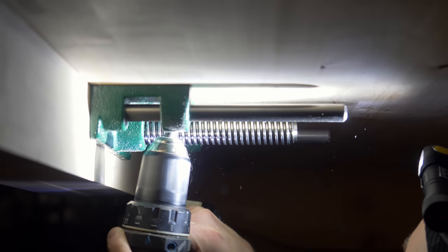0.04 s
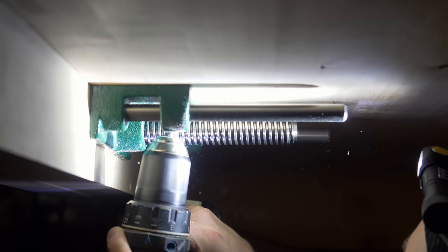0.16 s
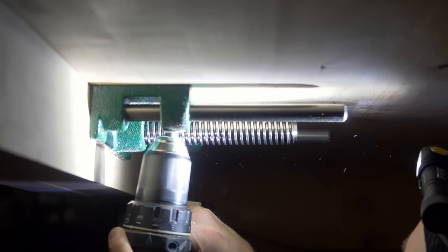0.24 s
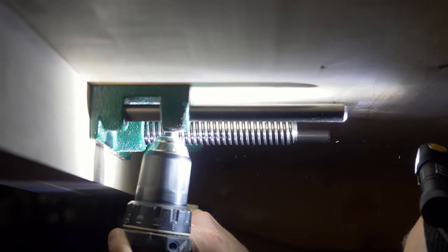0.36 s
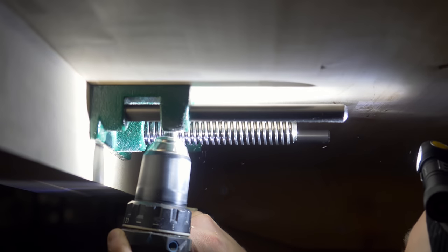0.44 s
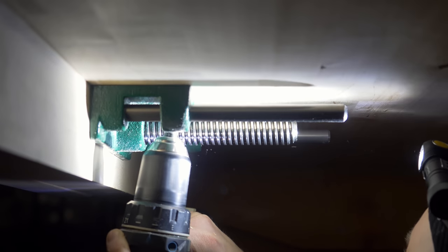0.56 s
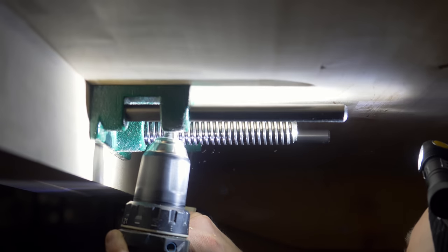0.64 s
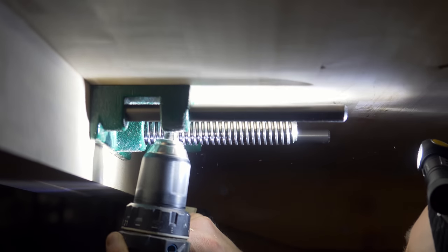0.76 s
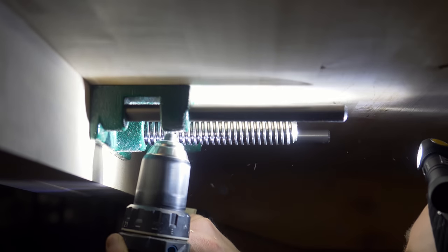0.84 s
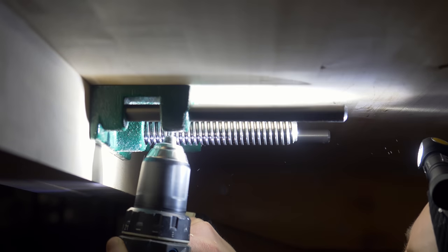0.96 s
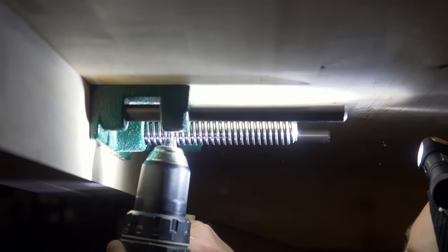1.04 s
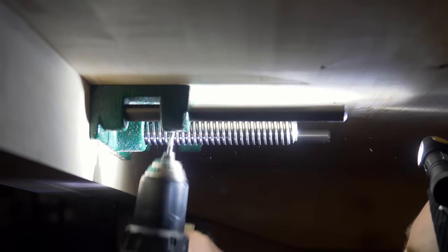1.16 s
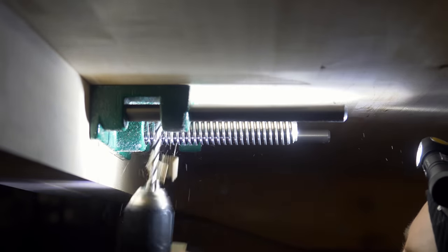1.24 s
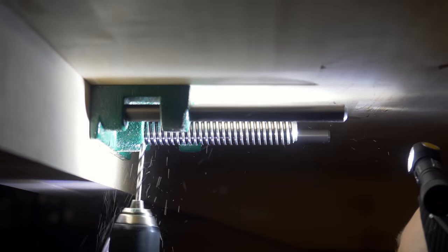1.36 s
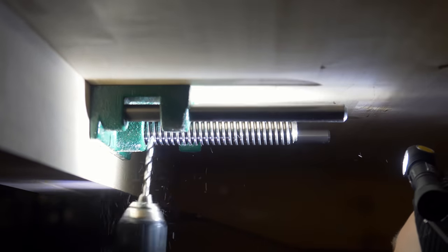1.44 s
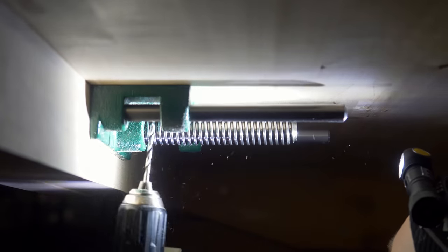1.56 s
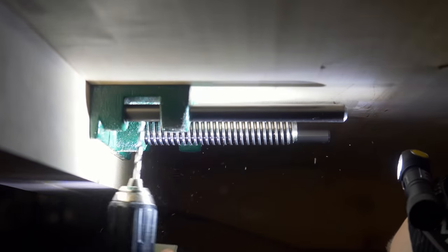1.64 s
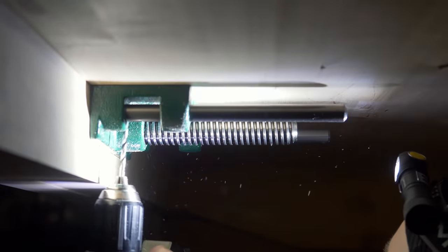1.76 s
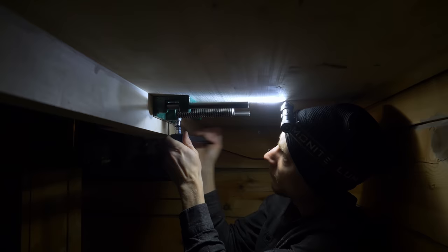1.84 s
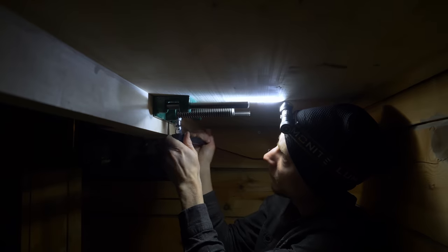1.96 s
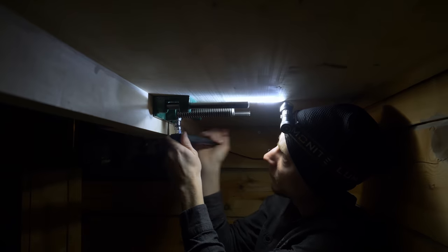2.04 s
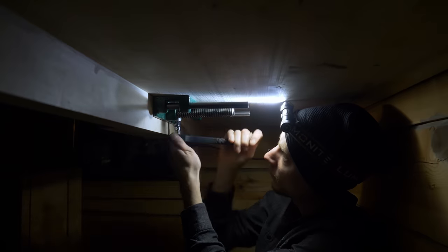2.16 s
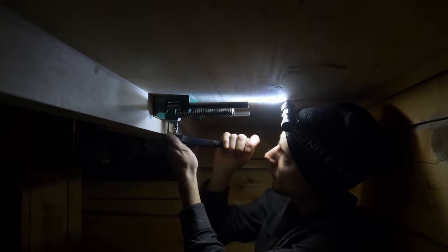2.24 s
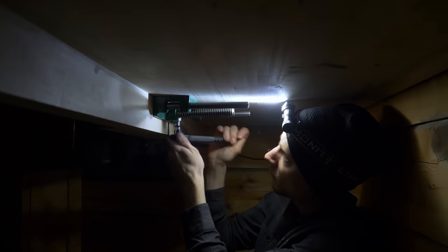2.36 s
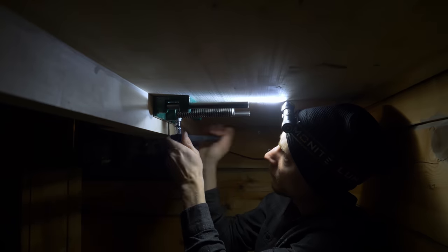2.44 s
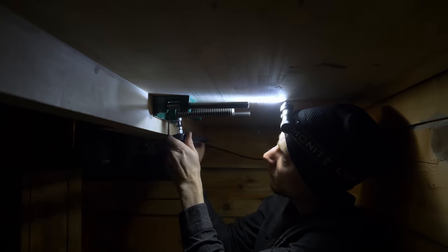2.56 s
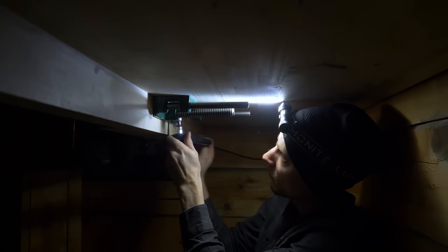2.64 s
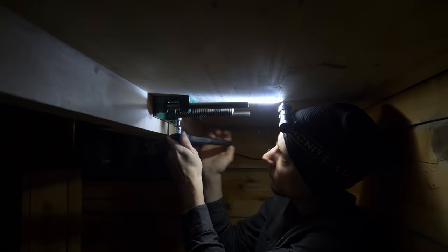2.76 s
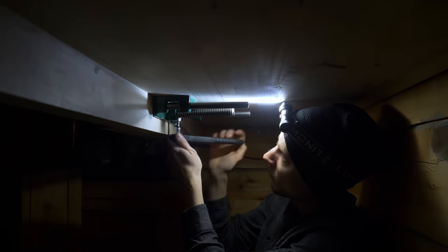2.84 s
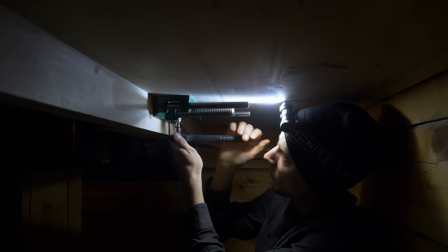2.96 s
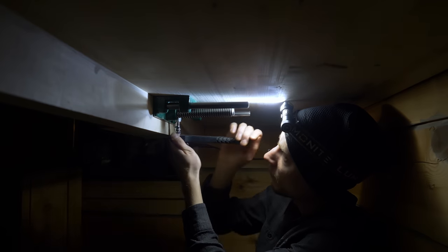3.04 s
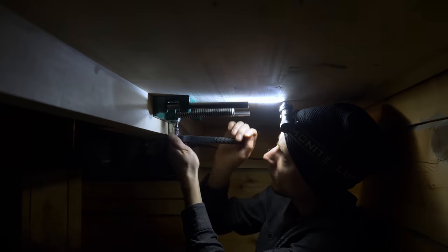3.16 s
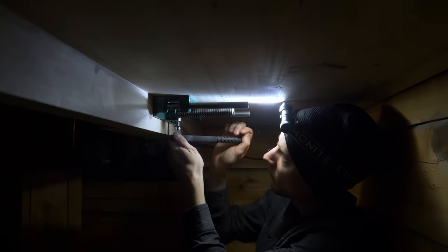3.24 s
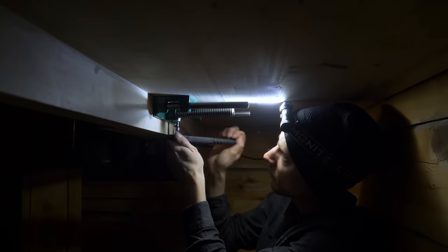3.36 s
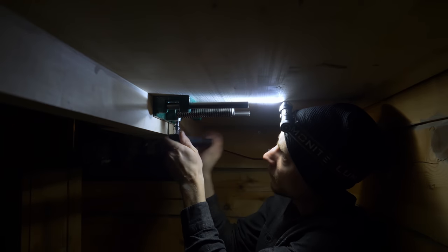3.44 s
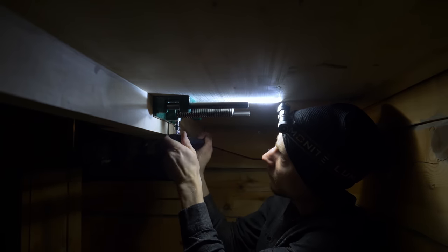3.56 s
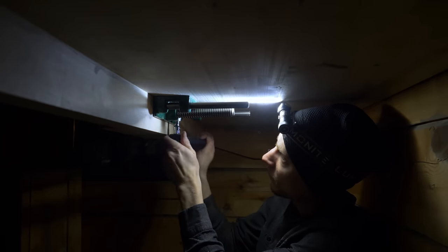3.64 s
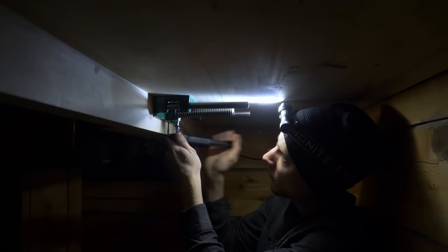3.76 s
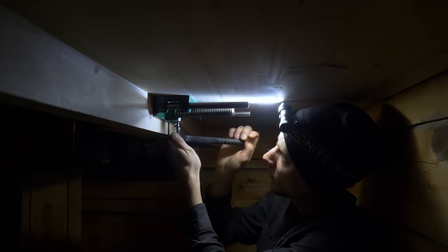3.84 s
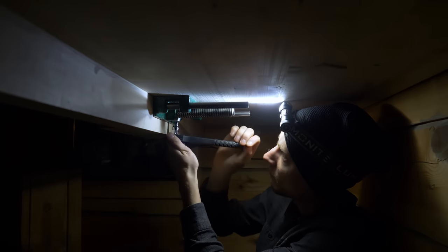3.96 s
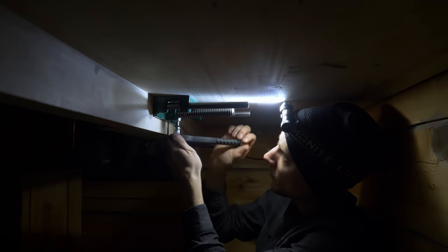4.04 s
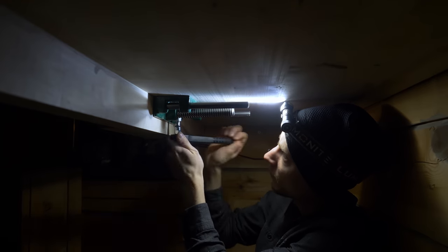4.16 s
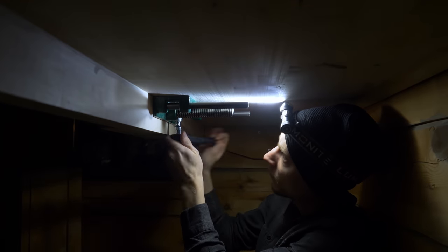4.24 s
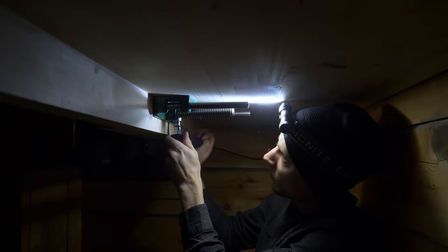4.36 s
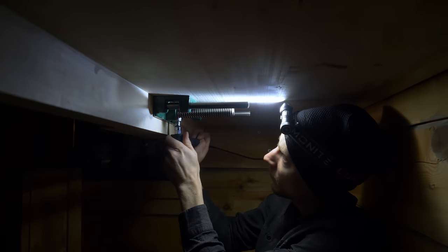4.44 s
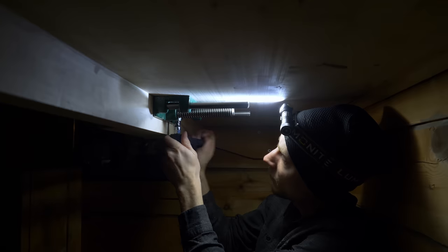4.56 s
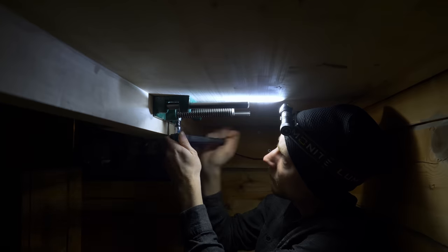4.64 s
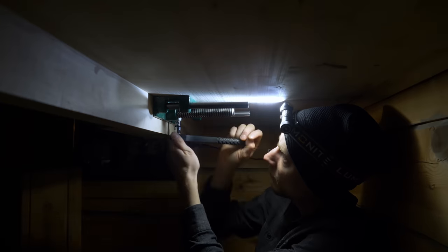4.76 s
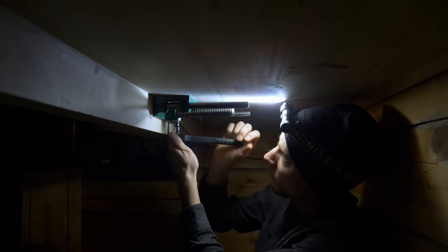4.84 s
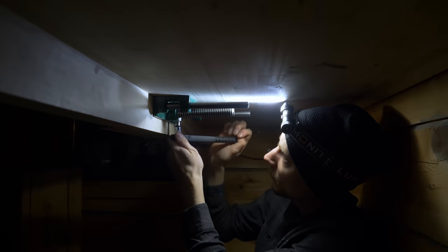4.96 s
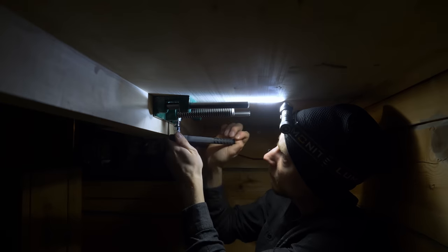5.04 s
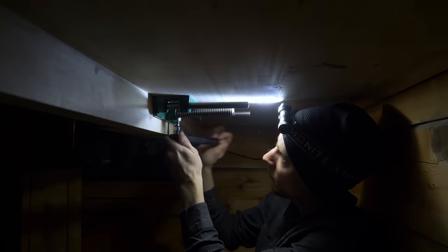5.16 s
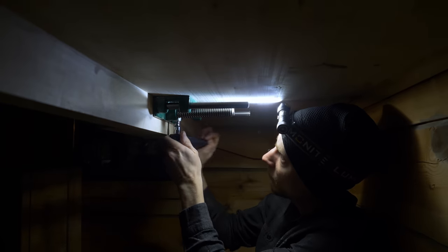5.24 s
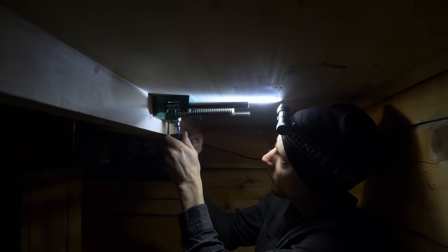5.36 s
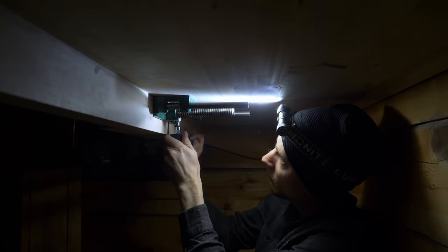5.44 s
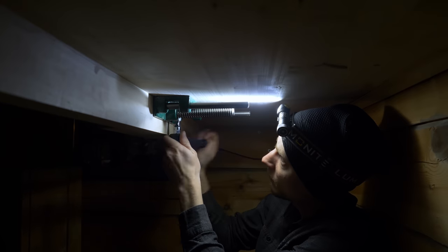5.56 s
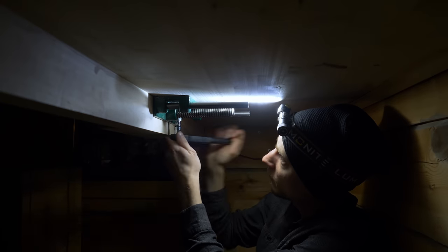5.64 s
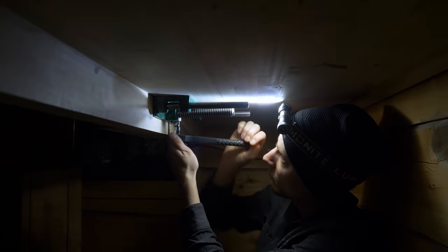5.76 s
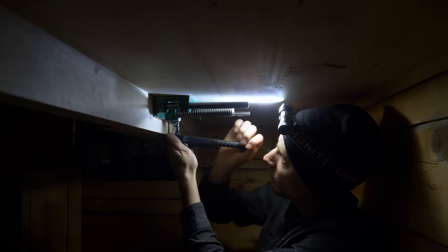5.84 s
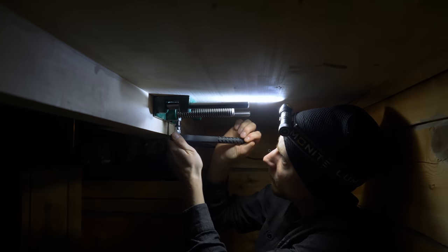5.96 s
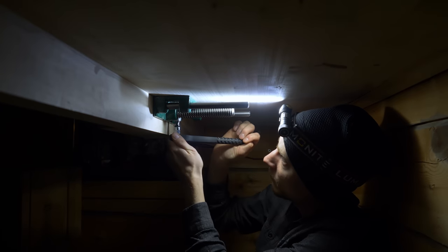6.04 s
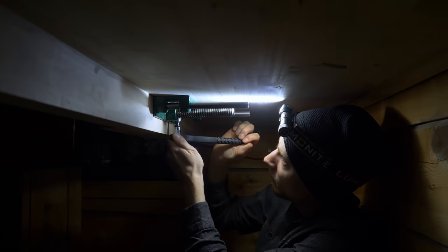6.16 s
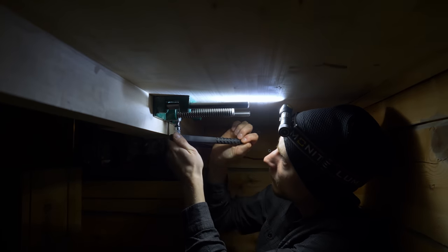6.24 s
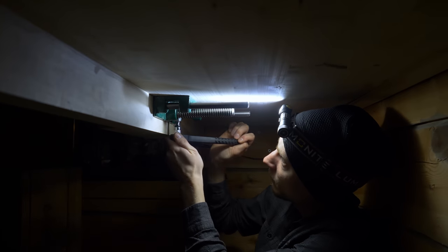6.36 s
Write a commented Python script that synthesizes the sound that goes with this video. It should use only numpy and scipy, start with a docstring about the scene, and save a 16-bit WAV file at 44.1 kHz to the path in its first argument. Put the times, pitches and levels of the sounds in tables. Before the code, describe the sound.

From the start a cordless drill bores into metal, close and loud: motor hum, gear whine and a gritty, bright rattle at a steady pitch. From about 0.75 s the pitch climbs, jumping around 1.05 s as the bit breaks through and runs free, with a clearer whine. It eases and stops abruptly at 1.5 s with a hard chuck clack and a short room tail. Near-silence follows, with faint hiss and rumble. From 1.9 s a wrench socket knocks lightly on steel and wood. Crisp ratchet runs of about five to seven clicks come near 2.15, 2.8-3.1 (broken in two), 3.85, 4.7 and 5.7 s, with small scrapes. Between them are uneven clacks, woody knocks and low bench thumps, strongest at 3.76 and 5.66 s. A last knock at 5.97 s and a soft thump fade into quiet air. Two close microphones, small workshop.

```python
"""A drill's whine and rattle come first, rising as the bit breaks through, then stopping short.
A cordless drill bores up through the holes of a metal vise under a wooden bench top; a ratchet wrench
then tightens a bolt in five strokes, clicking on each back swing and knocking the vise and boards.
Drill tones follow the shaft speed; blows are short noise bursts and dying modes of steel and wood.
Two close microphones face the work straight on, in a small workshop with faint hiss and rumble."""
import sys
import numpy as np
from scipy import signal
from scipy.fft import rfft, irfft
from scipy.io import wavfile
from scipy.ndimage import uniform_filter1d

SR = 44100
rng = np.random.default_rng(int(sys.argv[2]) if len(sys.argv) > 2 else 0)


def log_audio(samples):
    """Write samples as a 16-bit WAV file to the path given in sys.argv[1]."""
    # one column per channel
    frames = np.atleast_2d(samples).T
    # limit to full scale, then quantise
    limited = np.clip(frames, -1, 1)
    pcm = np.round(limited * 32767).astype(np.int16)
    wavfile.write(sys.argv[1], SR, pcm)


N = 282240
TIME = np.arange(N) / SR


def amp(db):
    """Decibels to gain."""
    return 10 ** (np.asarray(db) / 20)


def unit(x):
    """Scales to rms 1."""
    return x / np.sqrt(np.mean(x ** 2) + 1e-20)


def unit_blow(x, count):
    """Scales a blow to rms 1 over its first samples."""
    return x / np.sqrt(np.mean(x[:count] ** 2) + 1e-20)


def read(points, hz):
    """Reads a table of (Hz, value) on a log-frequency axis."""
    f, value = np.transpose(points)
    return np.interp(np.log(hz + 1), np.log(f + 1), value)


def colour(x, points, tilt_db=0):
    """Causal minimum-phase filter with the given spectrum, tilted in dB an octave above 1500 Hz."""
    hz = abs(np.fft.fftfreq(4096, 1 / SR))
    octaves = np.log2(np.maximum(hz / 1500, 1))
    log_gain = np.log(amp(read(points, hz) + tilt_db * octaves))
    # the Hilbert transform of the log gain gives the phase that puts the energy earliest
    taps = np.fft.ifft(np.exp(np.conj(signal.hilbert(log_gain)))).real
    return signal.fftconvolve(x, taps[:len(taps) // 2])[:len(x)]


def wander(rate_hz):
    """Slow random drift of rms 1, weakening above the given rate."""
    hz = np.fft.rfftfreq(N, 1 / SR)
    spectrum = rfft(rng.standard_normal(N))
    return unit(irfft(spectrum / (1 + (hz / rate_hz) ** 2), N))


def add(mix, s, sound):
    """Lays a sound into the mix at time s."""
    part = mix[round(s * SR):][:len(sound)]
    part += sound[:len(part)]


def ring(modes, t, spread_db, detune):
    """Dying modes of a struck body; each blow shifts them a little and shares its force out anew."""
    hz, t60, db = np.transpose(modes)[:, :, None]
    size, shift, sign = rng.standard_normal((3, len(modes), 1))
    decay = np.sign(sign) * amp(db + spread_db * size - 60 * t / t60)
    tones = np.sin(2 * np.pi * hz * (1 + detune * shift) * t)
    return (decay * tones).sum(0)


def chatter(t, rise, fall, grain=0.42):
    """A burst of tiny contacts, uneven in force, that swells and dies (rise and fall in s)."""
    noise, force = rng.standard_normal((2, len(t)))
    uneven = np.exp(grain * np.tanh(unit(uniform_filter1d(force, size=50))))
    swell = 1 - np.exp(-(t / rise) ** 2)
    return noise * uneven * swell * np.exp(-t / fall)


# the motor shaft speeds up as the bit breaks through: time_s, speed (turns a second)
SHAFT_SPEED = [(0, 256.3), (.3, 256.6), (.52, 259.6), (.72, 260.7), (.8, 269.4), (1.0, 276.7), (1.06, 305),
               (1.22, 318), (1.41, 318.8), (1.53, 293)]
# shaft speed with the bit biting, easing and running free (turns a second)
BITING_HZ, EASING_HZ, FREE_HZ = 256.6, 261, 319
# one level until the trigger is let go; load rises steeply as the speed sags
DRILL_DB, STOP_S, BRAKE_DB_PER_S, LOAD_POWER = -28, 1.5175, 650, 3.1


def drill_state():
    """Shaft speed, level in dB, and the load on the bit (0-1) that goes with the sag in speed."""
    speed = np.interp(TIME, *np.transpose(SHAFT_SPEED))
    sag = np.clip((FREE_HZ - speed) / (FREE_HZ - BITING_HZ), 0, 1)
    level_db = DRILL_DB - BRAKE_DB_PER_S * np.maximum(TIME - STOP_S, 0)
    return speed, level_db, sag ** LOAD_POWER


# tones of rotor, ten-tooth pinion and gears: multiples of the shaft speed
TONE_MULTIPLES = [1, 2, 4, 10, 11.25, 20, 23, 24, 30, 40, 50]
# level_db of each of those tones, relative to the drill, with the bit biting, easing and free
BITING_TONES_DB = [-16, -13, -22, -23, -11, -11, -15, -28, -18, -14, -30]
EASING_TONES_DB = [-26, -25, -20, -9, -20, -12, -22, -25, -14, -21, -29]
FREE_TONES_DB = [-17, -19, -16, -9, -19, -4, -14, -21, -15, -34, -46]
# the whine dies away first, as the trigger eases
EASE_OFF_S, WHINE_FADE_DB_PER_S = 1.464, 142.5


def drill_whine(jitter=0.00066, flutter_db=3):
    """Motor hum and gear tones, all locked to the shaft; their balance shifts as the bit comes free."""
    speed, level_db, _ = drill_state()
    level_db = level_db - WHINE_FADE_DB_PER_S * np.maximum(TIME - EASE_OFF_S, 0)
    turns = np.cumsum(speed * (1 + jitter * wander(35))) / SR
    out = np.zeros(N)
    for multiple, *states_db in zip(TONE_MULTIPLES, BITING_TONES_DB, EASING_TONES_DB, FREE_TONES_DB):
        tone_db = np.interp(speed, [BITING_HZ, EASING_HZ, FREE_HZ], states_db)
        gain = amp(level_db + tone_db + flutter_db * wander(22))
        out += gain * np.sin(2 * np.pi * (multiple * turns + rng.random()))
    return np.sqrt(2) * out


# spectrum of the gear and bit rattle while boring: pitch_hz, level_db (per Hz, relative)
BORING_COLOUR = [(50, -52), (165, -22), (240, -3.5), (310, -14.5), (450, -5.5), (580, -6.5), (1150, -2.5),
                 (2300, -4.5), (4900, -0.5), (5800, -6.5), (10500, -8), (13000, -18), (16000, -31)]
# the same running free: pitch_hz, level_db (per Hz, relative)
FREE_COLOUR = [(60, -31), (230, -25.5), (400, -16.5), (700, -4), (1300, 0), (2500, -3.5), (4900, -2),
               (6500, -7.5), (9700, -6.5), (12500, -15), (16000, -28)]
# resonances of the bit and the drill housing: pitch_hz, width_hz, level_db (over the raw rattle)
HOUSING_MODES = [(229.7, 2.3, 11), (420, 140, -0.5), (1112, 29, -2.5), (3110, 110, -12), (3800, 220, -5),
                 (4490, 88, -1.5), (4920, 174, 0.5)]


def drill_rattle(chips_per_s=350, chips_db=-10, boring_db=1.0, free_db=0, uneven_db=0.12, drift_db=3):
    """Teeth and cutting edges rub, chips snap off, and each housing resonance catches and lets go."""
    _, level_db, load = drill_state()
    rub = rng.standard_normal(N) * amp(uneven_db * wander(44))
    chips = rng.standard_normal(N) * (rng.random(N) < chips_per_s / SR)
    drive = unit(rub) + amp(chips_db) * unit(chips)
    housing = np.zeros(N)
    for hz, width, db in HOUSING_MODES:
        b, a = signal.iirpeak(hz, hz / width, SR)
        housing += amp(db) * signal.lfilter(b, a, drive * amp(drift_db * wander(20)))
    drive = drive + housing
    boring = amp(boring_db) * unit(colour(drive, BORING_COLOUR))
    free = amp(free_db) * unit(colour(drive, FREE_COLOUR))
    return amp(level_db) * (load * boring + (1 - load) * free)


# spectrum of steel on steel: pitch_hz, level_db (per Hz, relative)
STEEL_COLOUR = [(400, -36.5), (900, -8.5), (1500, -10), (2300, -5.5), (3800, -2.5), (6000, -2.5),
                (8200, -4.5), (10000, -1), (12000, -9.5), (16000, -18)]
# modes of the wrench: pitch_hz, decay_s (to -60 dB), level_db (relative)
WRENCH_MODES = [(2290, .03, -12), (3500, .02, -12), (3900, .012, -10), (5200, .012, -13), (7000, .012, -14),
                (9800, .025, -13)]
# upper modes of the bench boards: pitch_hz, decay_s (to -60 dB), level_db (relative)
BOARD_MODES = [(381, 0.047, 0), (470, 0.077, -12), (476.7, 0.18, 0.5), (542.7, 0.14, 1), (600, 0.017, -7),
               (695.3, 0.15, 0), (709, 0.15, -2.5), (1175, 0.17, -11)]
WRENCH_DB = -9


def click(bright_db, thump_db, snap_db=0, tilt_share=0.45):
    """Steel drops onto steel, chatters for a few milliseconds, and rings wrench and boards."""
    t = np.arange(SR // 4) / SR
    burst = chatter(t, rise=0.0042, fall=0.0046)
    snap = unit_blow(colour(burst, STEEL_COLOUR, tilt_share * bright_db), count=620)
    wrench = ring(WRENCH_MODES, t, spread_db=6.5, detune=0.056)
    steel = unit_blow(signal.fftconvolve(burst, wrench)[:len(t)], count=620)
    board = ring(BOARD_MODES, t, spread_db=-1.5, detune=0.031) * (1 - np.exp(-t / 0.0015))
    board = unit_blow(board, count=970)
    return amp(snap_db) * snap + amp(WRENCH_DB) * steel + amp(thump_db) * board


# stray steel clicks of chuck and socket: start_s, level_db, brightness_db (before click's tilt share)
STRAY_CLICKS = [(1.548, -31, -8), (1.721, -57.5, -11), (1.744, -60, -9), (1.836, -59, 8), (2.109, -46, -31),
                (2.364, -38.5, -19), (2.727, -48.5, -17.5), (3.248, -41.5, -11), (5.229, -56.5, -15)]


def clicks(thump_db=-16):
    """The chuck locks as the drill stops; later the socket ticks on the bolt."""
    out = np.zeros(N)
    for s, db, bright_db in STRAY_CLICKS:
        add(out, s, amp(db) * click(bright_db, thump_db))
    return out


# short soft bursts of broad noise: start_s, length_s, level_db
SOFT_BURSTS = [(1.878, 0.062, -52), (2.444, 0.24, -55.5), (3.686, 0.056, -58.5), (4.919, 0.027, -40.5),
               (5.376, 0.036, -56), (6.223, 0.034, -59)]


def soft_bursts():
    """Short broad bursts of coloured noise, each with a quick start and a flat top."""
    gain = np.zeros(N)
    for s, length, db in SOFT_BURSTS:
        shape = np.interp(TIME - s, [0, .004, 0.95 * length, length], [0.012, 0.72, .7, 0.0042])
        gain += amp(db) * shape
    burst_colour = [(60, -12.0), (250, 4.5), (2500, -9.5), (16000, -18.0)]  # (Hz, dB per Hz)
    return gain * unit(colour(rng.standard_normal(N), burst_colour))


# low modes of the bench top: pitch_hz, decay_s (to -60 dB), level_db (relative)
BENCH_MODES = [(78, 0.1, -23), (103, 0.16, -10.5), (139, 0.19, -10.5), (167.3, 0.19, -7.5),
               (226.5, 0.13, -2), (251.2, 0.22, -4.5), (328.6, 0.14, 0.5)]


def boom(t):
    """The whole bench top swells and rings low."""
    swell = 1 - np.exp(-t / 0.0078)
    return unit_blow(ring(BENCH_MODES, t, spread_db=2.5, detune=0.021) * swell, count=1320)


# dead thud of the wood: pitch_hz, level_db (per Hz, relative)
THUD_COLOUR = [(40, -52), (120, -13), (350, -1.5), (600, 11), (900, -5), (1600, -33), (4000, -50.5)]
# clack of the socket: pitch_hz, level_db (per Hz, relative)
CLACK_COLOUR = [(40, -50.5), (120, -28), (300, -11.5), (600, -3), (900, -1.5), (1220, 1), (1650, -9),
                (2100, -5.5), (3000, -13), (5000, -16.5), (10000, -21), (16000, -30.5)]


def knock(weight_db, hard_db, boom_gain_db=-2, board_gain_db=-1.0, clack_gain_db=0, tilt_db=-1.12,
          thud_db=-3, soft_s=0.00049):
    """The socket clacks on the bolt; the boards thud and ring at once and the whole bench booms after."""
    t = np.arange(SR // 3) / SR
    # the softer the contact, the slower the start
    onset = 1 - np.exp(-t / (soft_s * min(amp(-hard_db), 10)))
    board = unit_blow(onset * ring(BOARD_MODES, t, spread_db=-2.0, detune=0.032), count=1320)
    thud = unit_blow(onset * colour(chatter(t, rise=0.0011, fall=0.014), THUD_COLOUR), count=1320)
    clack = unit_blow(colour(chatter(t, rise=0.00088, fall=0.0092), CLACK_COLOUR, tilt_db), count=880)
    boards = amp(board_gain_db) * (board + amp(thud_db) * thud)
    bench = amp(weight_db + boom_gain_db) * boom(t)
    return bench + boards + amp(hard_db + clack_gain_db) * clack


# knocks of the wrench against the vise: start_s, level_db, weight_db (into the bench), hardness_db
WRENCH_KNOCKS = [(1.947, -42.5, -5.5, -10), (2.072, -43, -15, -28), (2.134, -33, -15.5, -9),
                 (2.286, -30.5, -18, -3.5), (2.351, -37.5, 2.5, -6), (2.392, -35.5, -2, 4),
                 (2.566, -38.5, 1.5, -6), (2.606, -33.5, -10, -5.5), (2.738, -36.5, -13, -15),
                 (2.809, -34.5, -10, -22), (3.168, -40, 9, -8), (3.269, -34, -1.5, 2.5), (3.38, -49, -5, 2),
                 (3.512, -36.5, -20, 9), (3.76, -22, -6, -9), (4.053, -34, -3, 6.5),
                 (4.075, -36.5, -9, -13), (4.6, -41.5, -10.5, -11), (4.637, -35.5, 0, -10),
                 (4.726, -29.5, -15.5, -6), (4.885, -39, -20, -15.5), (4.945, -37.5, -10, 3),
                 (4.965, -35, -7.5, -1), (5.498, -52.5, -11, 5.5), (5.523, -49, -14, 2),
                 (5.596, -41.5, -21, -8.5), (5.624, -38.5, -17, -13.5), (5.661, -25, -7.5, 1.5),
                 (5.966, -31, -5, 1.5)]
# the loose socket rebounds once after each knock
REBOUND_S, REBOUND_DB = 0.023, -12


def knocks(rebound_hard_db=-4):
    """The wrench knocks the vise, and a softer rebound follows each knock."""
    out = np.zeros(N)
    for s, db, weight_db, hard_db in WRENCH_KNOCKS:
        add(out, s, amp(db) * knock(weight_db, hard_db))
        rebound = knock(weight_db, hard_db + rebound_hard_db)
        add(out, s + REBOUND_S, amp(db + REBOUND_DB) * rebound)
    return out


def tooth_times(start, teeth, gap, fastest, slowing):
    """The handle slows away from its fastest tooth, so the clicks spread out."""
    gaps = gap + slowing * abs(np.arange(teeth - 1) - fastest) ** 3
    return start + np.r_[0, np.cumsum(gaps)]


# back swings of the ratchet, the second in two goes: start_s (first click), teeth (count),
# gap_s (shortest), fastest (tooth number), slowing (s per tooth cubed), force_db
BACK_SWINGS = [(2.141, 6, .0167, 1.3, .00044, -.2), (2.816, 5, .0346, 3.9, .00005, -1),
               (3.0405, 2, .0615, 0, 0, 0), (3.830, 6, .0241, 0, .00051, .6),
               (4.7134, 6, .0221, 1.35, .0014, -.6), (5.7035, 7, .0213, .75, .00044, .7)]
SCRAPE_DB, SCRAPE_LEAD_S, SCRAPE_FADE_S = -43.5, 0.086, 0.064


def scrape(slips_per_s=260, size_spread_db=4, clack_db=-3):
    """Tiny uneven slips of the turning socket rattle the steel and the boards while the handle moves."""
    moving = np.zeros(N)
    for *motion, force_db in BACK_SWINGS:
        first, *_, last = tooth_times(*motion)
        edges = [first - SCRAPE_LEAD_S, first, last, last + SCRAPE_FADE_S]
        moving = np.maximum(moving, amp(force_db) * np.interp(TIME, edges, [0, 1, 1, 0]))
    sizes = rng.standard_normal(N) * amp(size_spread_db * wander(40))
    slips = sizes * (rng.random(N) < slips_per_s / SR)
    boards = unit(colour(slips, THUD_COLOUR))
    steel = unit(colour(slips, CLACK_COLOUR))
    return amp(SCRAPE_DB) * moving * (boards + amp(clack_db) * steel)


# base level, brightness and thump in the boards of every tooth (dB)
PAWL_DB, PAWL_BRIGHT_DB, PAWL_THUMP_DB = -24.5, 1.5, -8.5


def ratchet(uneven_db=.5, colour_spread_db=1.0, thump_spread_db=3, first_tooth_db=-1, dulling_db=0.85,
            settling_db=0.5):
    """The pawl drops off tooth after tooth: the first softer, later ones duller and shaking boards less."""
    out = np.zeros(N)
    for *motion, force_db in BACK_SWINGS:
        for k, s in enumerate(tooth_times(*motion)):
            force, tint, push = rng.standard_normal(3)
            db = PAWL_DB + force_db + uneven_db * force + first_tooth_db * (k == 0)
            bright_db = PAWL_BRIGHT_DB + colour_spread_db * tint - dulling_db * k
            thump_db = PAWL_THUMP_DB + thump_spread_db * push - settling_db * k
            add(out, s, amp(db) * click(bright_db, thump_db))
    return out


# dull thumps of the bench as it takes the strain: start_s, level_db (of the boom, before its own gain)
BENCH_THUMPS = [(2.307, -35), (3.204, -38), (4.995, -33.5), (5.229, -49), (5.342, -45.5), (6.012, -41.5)]


def thumps(boards_db=-16, hard_db=-6):
    """Soft, heavy pushes that boom the bench and barely stir the boards."""
    out = np.zeros(N)
    for s, db in BENCH_THUMPS:
        add(out, s, amp(db + boards_db) * knock(-boards_db, hard_db))
    return out


# decay of the small workshop: pitch_hz, decay_s (to -60 dB)
ROOM_DECAY = [(100, 0.5), (500, 0.3074), (1500, 0.33), (4500, 0.2546), (9000, 0.2537), (16000, 0.08)]


def echo(x, early_db=0, early_t60=.07):
    """Close reflections under the bench, then the tail of the small room, as sparse random taps."""
    t = np.arange(SR // 2) / SR
    taps = rng.standard_normal(len(t)) * (rng.random(len(t)) < .15) * (t > .002)
    hz, when, bands = signal.stft(taps, SR, nperseg=256)
    late = amp(-60 * when / read(ROOM_DECAY, hz)[:, None])
    early = amp(early_db - 60 * when / early_t60)
    tail = signal.istft(bands * (late + early), SR, nperseg=256)[1]
    return signal.fftconvolve(x, tail / np.linalg.norm(tail))[:N]


# stereo width of the workshop's sound: pitch_hz, level_db (of the side signal, relative)
SIDE_COLOUR = [(100, -29.5), (600, -18.5), (1300, -5.5), (3000, -7.5), (6000, -7), (9000, -15),
               (13000, -1.5)]


def place(x, wet_db, side_db):
    """A source straight ahead of two close microphones; only reflections differ between them."""
    side = amp(side_db) * colour(echo(x, early_db=17, early_t60=.04), SIDE_COLOUR)
    mid = x + amp(wet_db) * echo(x, early_db=3.5, early_t60=0.043)
    return np.array([mid + side, mid - side])


# spectrum of the still air: pitch_hz, level_db (per Hz, relative)
AIR_COLOUR = [(25, -33), (90, -4), (230, -2.5), (500, -5.5), (900, -9.5), (2000, -20.5), (16000, -26)]
AIR_DB = -62.5


def air():
    """Faint hiss and rumble of the room as wide noise, fuller once the wrench work begins."""
    mid, side = (unit(colour(rng.standard_normal(N), AIR_COLOUR)) for _ in range(2))
    side = amp(2) * colour(side, SIDE_COLOUR)
    level_db = AIR_DB + np.interp(TIME, [1.86, 1.88], [-9, -1])
    return amp(level_db) * np.array([mid + side, mid - side])


def scene():
    """Drill, then wrench, in the same corner of the workshop."""
    drill = place(drill_whine(), wet_db=-25.5, side_db=-8.0)
    drill = drill + place(drill_rattle(), wet_db=-6.5, side_db=-1.5)
    steel = place(clicks() + ratchet(), wet_db=-10, side_db=-1.5)
    wood = place(soft_bursts() + knocks() + scrape() + thumps(), wet_db=-4.5, side_db=0.5)
    return drill + steel + wood + air()


EDGE_HZ = 16000


def record(dry):
    """A low cut at 60 Hz that thins the deep bass, and an upper band limit."""
    low_cut = signal.butter(2, 60, "highpass", fs=SR, output="sos")
    thinned = signal.sosfilt(low_cut, dry)
    band_limit = signal.firwin(401, EDGE_HZ, window=("kaiser", 8), fs=SR)
    return signal.oaconvolve(thinned, band_limit[None], "same")


dry = scene()
out = record(dry)
log_audio(out)
```